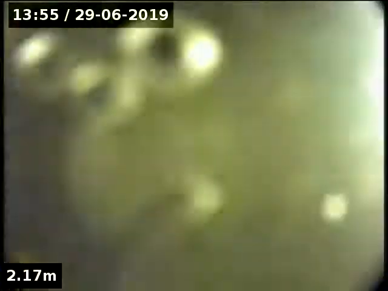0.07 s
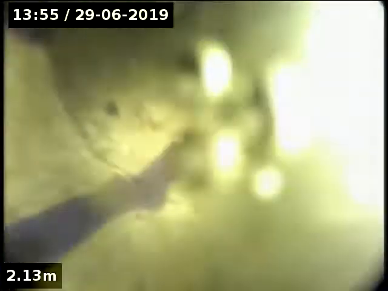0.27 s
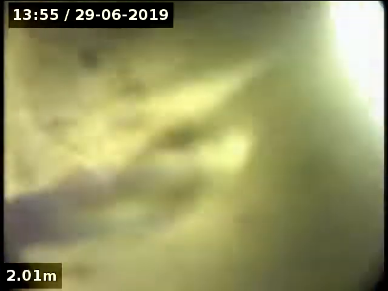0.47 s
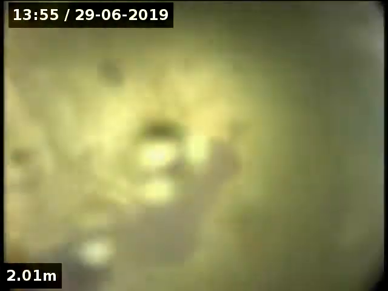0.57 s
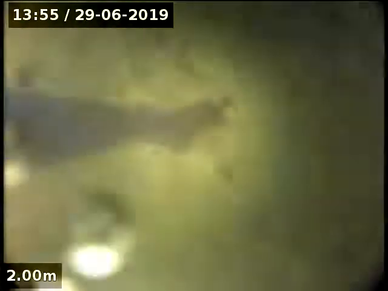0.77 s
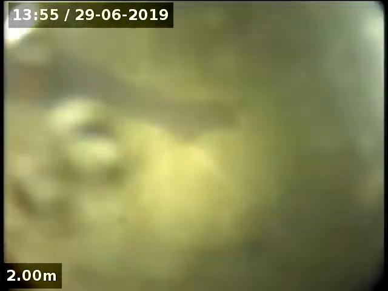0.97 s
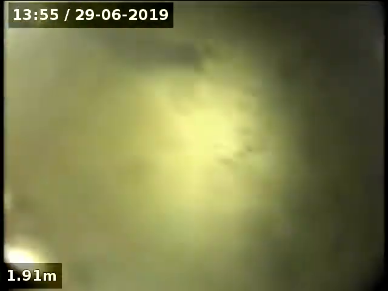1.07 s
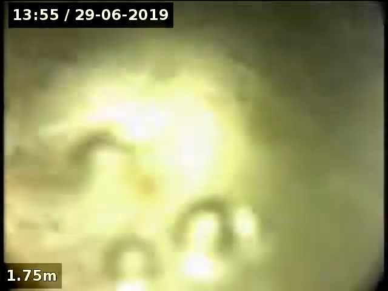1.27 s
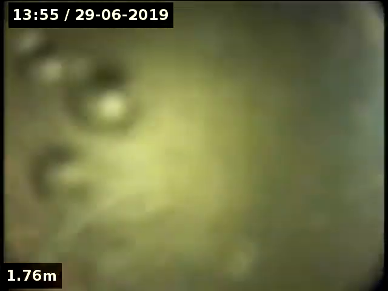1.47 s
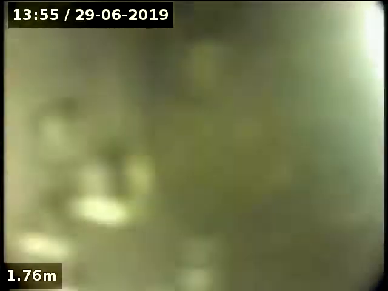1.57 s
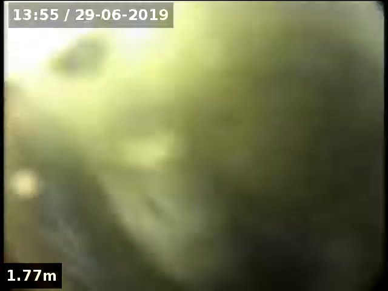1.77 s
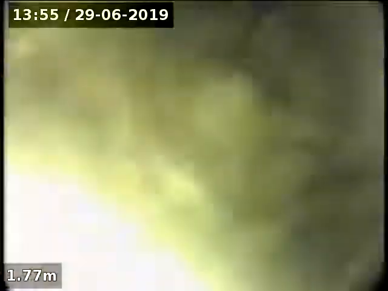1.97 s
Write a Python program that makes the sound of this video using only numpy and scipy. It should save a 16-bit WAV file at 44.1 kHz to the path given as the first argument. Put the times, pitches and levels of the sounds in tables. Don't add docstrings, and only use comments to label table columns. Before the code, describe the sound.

Flexible inspection rod pulled back through a drain pipe, scraping, bumping dully and knocking hard three times.

```python
import sys
import numpy as np
from scipy import signal
from scipy.fft import rfft, irfft
from scipy.io import wavfile
from scipy.ndimage import uniform_filter1d

SR = 44100
rng = np.random.default_rng(int(sys.argv[2]) if len(sys.argv) > 2 else 0)


def unload_wav(signal):
    wavfile.write(
        sys.argv[1],
        SR,
        np.round(np.clip(np.atleast_2d(signal).T, -1, 1) * 32767).astype(np.int16),
    )


def gain_from_decibels(decibels):
    exponent = np.asarray(decibels, float) / 20
    return 10 ** exponent


N = 88332


def unit(x):
    return x / np.sqrt(np.mean(x ** 2))


def colour(x, points):
    f, db = np.array(points).T
    hz = np.arange(N // 2 + 1) * SR / N + 1
    gain = gain_from_decibels(np.interp(np.log(hz), np.log(f), db, left=-120, right=-120))
    return irfft(rfft(x) * gain, N)


def band(x, hz, width_hz):
    return signal.lfilter(*signal.iirpeak(hz, hz / width_hz, fs=SR), x)


def noise_band(hz, width_hz):
    noise = rng.standard_normal(N)
    return unit(band(band(noise, hz, width_hz), hz, width_hz))


def walk(rate):
    hold = int(SR / rate)
    steps = np.repeat(rng.standard_normal(N // hold + 1), hold)
    return 0.6 * uniform_filter1d(uniform_filter1d(steps, hold), hold)[:N]


# [f/Hz, level/dB]
AIR_COLOUR = [(18, -49.5), (30, -19), (195, 0), (469, -6.5), (599, -3.5), (813, -4), (1330, -7),
              (2250, -10.5), (3900, -38.5), (5070, -72.5), (8580, -120)]


def air():
    noise = unit(colour(rng.standard_normal(N), AIR_COLOUR))
    return gain_from_decibels(-42) * noise * gain_from_decibels(2.7 * walk(7.8))


# [t/s, level/dB]
DRAG_LEVEL = [(0, -40), (.05, -34.5), (0.078, -39.5), (.13, -36.5), (0.169, -32.5), (0.234, -30.5),
              (0.28, -40), (.5, -55.5), (.66, -46.5), (0.779, -33.5), (0.857, -37), (.93, -28.5),
              (.97, -35), (1.118, -50), (1.141, -54), (1.33, -51), (1.52, -58.5), (1.659, -43),
              (1.85, -52.5), (2, -58)]
# [f/Hz, level/dB]
DRAG_COLOUR = [(90, -28.5), (200, -12), (350, -7), (550, 2.5), (900, -4.5), (1600, -9.5), (2560, -21.5),
               (3900, -38.5)]


def drag(t):
    grit = rng.standard_normal(N) * gain_from_decibels(2.5 * walk(150))
    times, levels = np.array(DRAG_LEVEL).T
    return unit(colour(grit, DRAG_COLOUR)) * gain_from_decibels(np.interp(t, times, levels) + 3 * walk(25))


# [t/s, peak level/dB, ring f/Hz,
# direction of push (+1 or -1)]
BUMPS = [(0.0055, -21.5, 323, 1), (0.0133, -23.5, 334, 1), (0.036, -25.6, 557, -1),
         (0.0505, -24.5, 523, -1), (0.0915, -25.7, 231, 1), (0.1068, -26.5, 304, 1),
         (0.1407, -22.6, 525, -1), (0.1588, -21.5, 495, -1), (0.1723, -25.3, 356, -1),
         (0.1834, -22.3, 345, 1), (0.1976, -20.9, 232, 1), (0.211, -14.8, 274, -1),
         (0.2229, -18.5, 234, 1), (0.2304, -19.6, 465, 1), (0.2394, -22.4, 588, -1),
         (0.2547, -23.5, 312, -1), (0.4957, -24.7, 229, 1), (0.539, -22.8, 259, -1),
         (0.5552, -23.8, 242, 1), (0.7818, -24.6, 486, 1),
         (0.8315, -20.2, 280, -1), (0.8415, -14.3, 325, 1), (0.8496, -20.9, 230, -1),
              (0.8582, -24.5, 328, 1), (0.8681, -24.6, 328, -1), (0.9042, -9.5, 356, 1),
              (0.9139, -18.4, 379, -1), (0.9271, -20.2, 389, 1), (0.9355, -22.2, 515, 1),
              (0.9436, -25.9, 430, -1), (0.9532, -20.7, 408, 1), (0.9613, -25.5, 391, -1),
              (0.9719, -24.1, 459, 1), (0.9847, -11.1, 371, 1), (0.9943, -10.6, 322, 1),
              (1.0046, -14.5, 260, 1), (1.0095, -6.0, 330, 1), (1.0156, -15, 400, 1),
              (1.0208, -7.2, 284, 1), (1.0304, -18, 322, 1), (1.0384, -9.5, 370, 1),
              (1.0463, -18.1, 457, 1), (1.0578, -18.9, 288, -1), (1.0735, -16.9, 276, 1),
              (1.0843, -15.2, 301, 1), (1.279, -20.4, 232, -1),
         (1.5615, -23.6, 271, 1), (1.6181, -16.5, 275, 1), (1.6288, -16.3, 251, 1),
               (1.6418, -22.4, 297, 1), (1.6536, -14.2, 391, -1), (1.6674, -14.0, 287, 1),
               (1.6781, -21.5, 309, -1), (1.6869, -11.6, 394, 1), (1.7041, -21.5, 311, 1),
               (1.7497, -25.3, 211, -1), (1.7623, -16.5, 237, 1), (1.7718, -23.3, 204, 1),
               (1.7812, -15.3, 271, 1), (1.7945, -22.9, 235, -1), (1.8439, -19.0, 282, -1),
               (1.8563, -24.9, 260, 1), (1.8658, -19, 246, 1), (1.8951, -26.2, 255, -1),
         (.565, -24, 212, -1), (0.64, -34, 241, 1), (0.549, -27, 222, 1), (1.585, -28, 130, -1),
               (1.604, -26.5, 262, 1), (1.822, -31, 298, 1), (1.6924, -18, 330, 1), (1.8397, -23, 300, 1),
               (1.9055, -28, 220, 1), (1.6131, -23, 300, 1), (1.0341, -11, 640, 1), (1.0354, -8, 800, 1),
               (1.0245, -18, 230, 1), (.8767, -18, 500, 1), (1.5565, -28, 420, -1), (.9887, -18, 330, 1),
               (1.8615, -26, 420, 1), (.8990, -15, 260, 1), (.8840, -13, 620, 1)]


def bumps(t):
    first_pull_ends_s, shudder_s = 0.3, 0.0071
    out, shake = np.zeros(N), np.zeros(N)
    for s, db, hz, way in BUMPS:
        i = slice(max(int((s - 0.03) * SR), 0), int((s + 0.05) * SR))
        turns = (t[i] - s) * hz
        far = s < first_pull_ends_s
        rise = np.exp(-(turns / 0.38) ** 2)
        fall = np.exp(-turns / (1.5 if far else 0.73))
        push = np.where(turns < 0, rise, fall) * np.cos(2 * np.pi * turns)
        if not far:
            push += 0.3 * np.exp(-(turns / 0.34) ** 2) * np.cos(4 * np.pi * turns)
        out[i] += np.sign(way) * gain_from_decibels(db) * push
        shake[i] += gain_from_decibels(db) * np.exp(-np.abs(t[i] - s) / shudder_s)
    wobble = gain_from_decibels(-16.5) * noise_band(234, 247)
    chatter = gain_from_decibels(-30.5) * noise_band(640, 300)
    out = out + shake * (wobble + chatter)
    no_rumble = signal.butter(2, 90, "high", fs=SR, output="sos")
    return signal.sosfiltfilt(no_rumble, out)


# [middle t/s, half length/s, level/dB, centre f/Hz]
SCUFFS = [
    (.01, 0.018, -42, 2200),
    (1.515, 0.011, -46, 1990),
    (1.62, 0.076, -46, 2000),
    (.76, .02, -44, 1600),
    (1.967, 0.066, -45.5, 1760),
    (.89, .014, -31, 1500),
    (1.105, .02, -40, 750),
]


def scuff(t, brushes):
    out = np.zeros(N)
    for s, half_s, db, hz in brushes:
        swell = np.exp(-((t - s) / half_s) ** 2)
        out += gain_from_decibels(db) * swell * noise_band(hz, 0.45 * hz)
    return out


# [f/Hz, width/Hz, level/dB]
SLIDE_LOW = [(863, 160, 0.5), (1750, 92, -9.5), (2320, 260, -13.5), (2685, 120, -14), (3046, 430, -7)]
SLIDE_HIGH = [(4680, 140, -30.5), (5230, 820, -12.5), (6050, 150, -23), (6780, 650, -21.5),
              (7930, 340, -33)]


def slide(t, bands, fade=1):
    start_s, attack_s, hold_s, t60_s = 0.075, 0.025, 0.068, 0.67
    u = t - start_s
    rise = np.clip(u / attack_s, 0, 1)
    fall = gain_from_decibels(-60 * np.clip(u - attack_s - hold_s, 0, None) / t60_s / fade)
    hiss = sum(gain_from_decibels(db) * noise_band(hz, width_hz) for hz, width_hz, db in bands)
    flicker = gain_from_decibels(0.5 * walk(67))
    return gain_from_decibels(-35) * rise * fall * flicker * hiss


# [t/s, peak level/dB, f/Hz, half length/s]
LURCHES = [
    (0.084, -35, 129.5, 0.0094),
    (.19, -40, 110, .02),
    (0.498, -43, 63.4, 0.018),
    (0.846, -39, 112.6, 0.022),
    (1.155, -40.5, 44.3, .012),
    (1.21, -29.5, 189.4, 0.01),
    (1.556, -36.5, 76.6, 0.014),
    (1.694, -38, 61.1, 0.018),
    (1.9, -38, 121, 0.02),
]


def lurches(t):
    out = np.zeros(N)
    for s, db, hz, half_s in LURCHES:
        swell = np.exp(-((t - s) / half_s) ** 2)
        out += gain_from_decibels(db) * swell * np.cos(2 * np.pi * hz * (t - s))
    return out


# [t/s, f/Hz, peak level/dB, time
# to fall 60 dB/s]
RINGS = [(0.8803, 2580, -21, 0.027), (0.8784, 1480, -17.5, .05), (.8800, 1023, -25, 0.058),
         (0.8831, 394, -15.5, 0.036), (0.8851, 1224, -16, 0.046), (.8880, 776.6, -14, 0.098),
         (0.8895, 1657, -23, .05), (0.897, 282, -15.5, 0.048), (.9035, 580, -17.5, 0.083),
         (.9080, 1750, -34, 0.033), (1.0337, 1404, -20.5, 0.023), (1.0350, 2060, -22, 0.026),
         (1.0396, 1160, -18.5, 0.017), (1.0380, 1790, -27, 0.018), (1.0432, 877, -25.5, .03),
         (1.0435, 2070, -35, .02), (1.1612, 583, -9, 0.032), (1.1618, 1350, -14.5, 0.03),
         (1.1612, 2150, -22, 0.041), (1.161, 2526, -30, 0.047), (1.1632, 3093, -32.5, .03),
         (1.1650, 905, -15.5, 0.058), (1.1669, 1668, -18.5, 0.029), (1.1700, 495, -21.5, 0.064),
         (1.1625, 263.4, -26.5, 0.045), (1.1612, 3570, -36.5, 0.021), (1.1570, 892, -29, 0.047),
         (.2290, 639, -24, 0.11)]


def rings(t):
    rise_s = 0.00061
    out = np.zeros(N)
    for s, hz, db, t60_s in RINGS:
        u = np.clip(t - s, 0, None)
        out += gain_from_decibels(db - 60 * u / t60_s) * -np.expm1(-u / rise_s) * np.sin(2 * np.pi * hz * u)
    return out


# [t/s, level/dB, rattle length/s, rattle level/dB, brightness/dB per octave]
KNOCKS = [
    (.5845, -31, 0.025, -6, -0.5),
    (.777, -26, 0.0083, -9, -2.5),
    (.8790, -17, 0.02, -4, 1),
    (1.0332, -16.5, 0.0056, -2.5, 2),
    (1.1611, -14.5, 0.012, -14.5, 1.5),
    (1.6535, -30, 0.0023, -18, -2),
]
# [f/Hz, level/dB, time to fall 60 dB/s]
PIPE = [(495, -7.5, 0.044), (600, 10, 0.018), (763, 2.5, 0.035), (964, 1, 0.045), (1170, 8, 0.011),
        (1450, -4.5, 0.033), (1540, 4, 0.023), (1846, -6, 0.061), (2150, -11, 0.058), (2350, -19.5, 0.024),
        (3106, -60.5, .02)]


def pipe_ring(u, tilt_db, phases):
    out = np.zeros(len(u))
    for (hz, db, t60_s), phase in zip(PIPE, phases):
        level = gain_from_decibels(db + tilt_db * np.log2(hz / 1000) - 60 * u / t60_s)
        out += level * np.sin(2 * np.pi * (hz * u + phase))
    return out


def knocks(t):
    ticks_per_s, tail_t60_s, blow_rise_s = 2500, 0.33, 0.0014
    out = np.zeros(N)
    u = t[:int(0.25 * SR)]
    duller = signal.butter(1, 2160, fs=SR)
    for s, db, rattle_s, rattle_db, tilt_db in KNOCKS:
        ticks = (rng.random(len(u)) < ticks_per_s / SR) * rng.choice([-1, 1], len(u))
        rattle = ticks / np.sqrt(ticks_per_s * 0.004) * gain_from_decibels(rattle_db) * np.exp(-(u / rattle_s) ** 3)
        tail = rng.standard_normal(len(u)) * gain_from_decibels(-17.5 - 60 * u / tail_t60_s) / np.sqrt(SR * 0.004)
        rebounds = signal.lfilter(*duller, rattle + tail)
        blow = pipe_ring(u, tilt_db, rng.random(len(PIPE))) * -np.expm1(-u / blow_rise_s)
        answer = pipe_ring(u, tilt_db, np.zeros(len(PIPE)))
        hit = blow + signal.fftconvolve(rebounds, answer)[:len(u)]
        i = int(s * SR)
        out[i:i + len(u)] += gain_from_decibels(db - 6) * hit[:N - i]
    return out


# [f/Hz, level/dB]
CRACK_COLOUR = [(4050, -29.5), (4400, -6.5), (6300, -1), (7300, -9.5), (8600, -28.5)]


def cracks(t):
    length_s = 0.0063
    env = np.zeros(N)
    for s, db, _, _, tilt_db in KNOCKS:
        env += gain_from_decibels(db - 31.5 + 2.6 * tilt_db) * (t > s) * np.exp(-((t - s) / length_s) ** 2)
    return env * unit(colour(rng.standard_normal(N), CRACK_COLOUR))


def scene():
    t = np.arange(N) / SR
    breath = air()
    blows = bumps(t) + knocks(t) + rings(t) + lurches(t)
    friction = drag(t) + slide(t, SLIDE_LOW) + scuff(t, SCUFFS)
    return (breath + blows + friction)[None]


def top_cut(x):
    return signal.sosfilt(signal.butter(12, 8950, fs=SR, output="sos"), x)


# [f/Hz, level/dB]
BAND_EDGE = [(20, -3.5), (60, 0), (3000, -1.5), (3500, -6), (3880, -17), (4000, -24)]
MIRROR = [(4000, -28), (4120, -4.5), (5000, -12), (6000, -29.5), (6800, -34), (7200, -49), (7500, -84.5)]
# [f/Hz, level/dB]
HISS_COLOUR = [(3100, 4.5), (3900, -17), (4000, -35.5), (4100, -14), (5500, -0.5), (7000, -1),
               (8000, -10.5), (8800, -37)]
# [middle t/s, half length/s, level/dB, centre f/Hz]
WISP = [
    (1.683, .03, -65, 6200),
]
# [start t/s, end t/s]
GAP_S = (1.3648, 1.4758)


def record(dry):
    sample_hz, bend, splice_s = 8000, 0.75, 1.5762
    t = np.arange(N) / SR
    bent = np.expm1(bend * dry[0]) / bend
    low = colour(bent, BAND_EDGE)
    mirrored = colour(2 * low * np.cos(2 * np.pi * sample_hz * t), MIRROR)
    bright = cracks(t) + scuff(t, WISP) + slide(t, SLIDE_HIGH, fade=0.54)
    hiss = gain_from_decibels(-68.5) * unit(colour(rng.standard_normal(N), HISS_COLOUR))
    click = gain_from_decibels(-27) * (t > splice_s) * np.exp(-np.clip(t - splice_s, 0, None) / 0.00034)
    mix = low + mirrored + bright + hiss + click
    mix = mix * ((t < GAP_S[0]) | (t > GAP_S[1]))
    mix = signal.sosfilt(signal.butter(12, 8700, fs=SR, output="sos"), mix)
    return top_cut(mix[None])


dry = scene()
out = record(dry)
unload_wav(out)
```